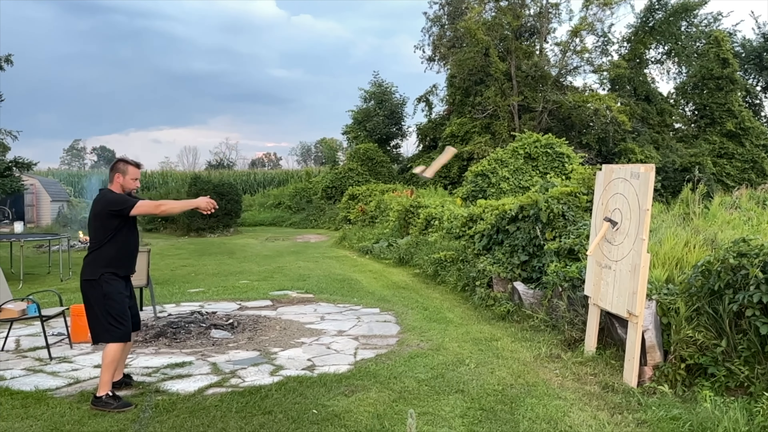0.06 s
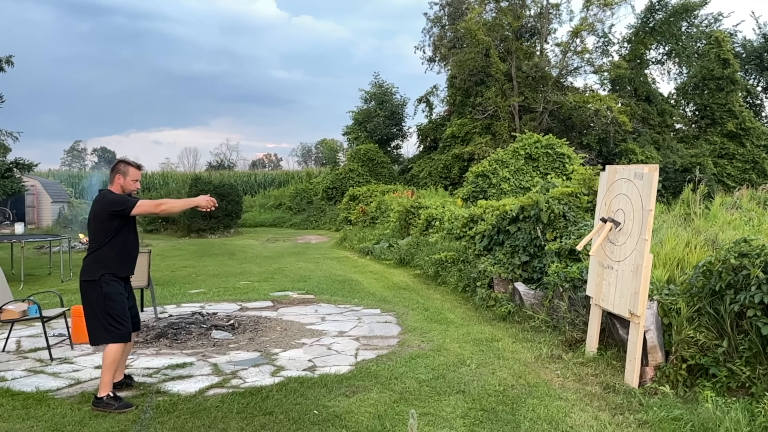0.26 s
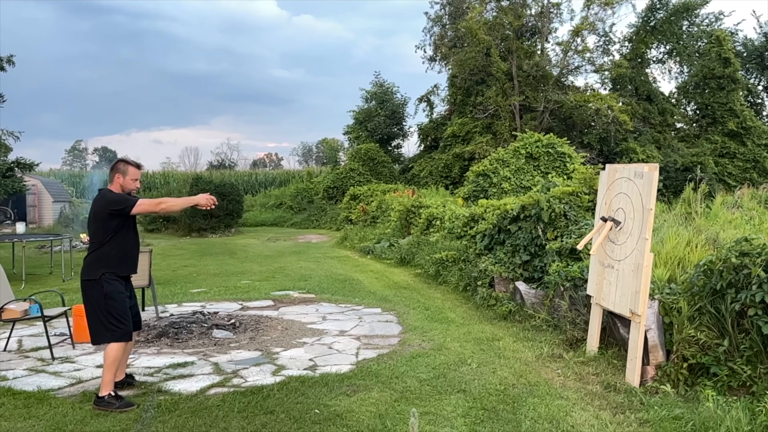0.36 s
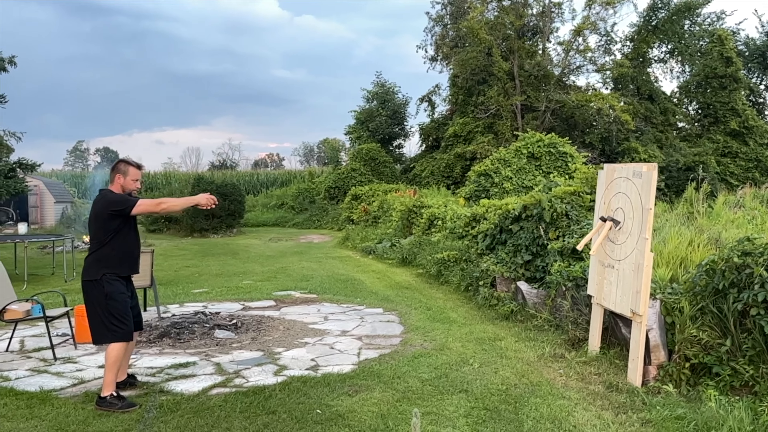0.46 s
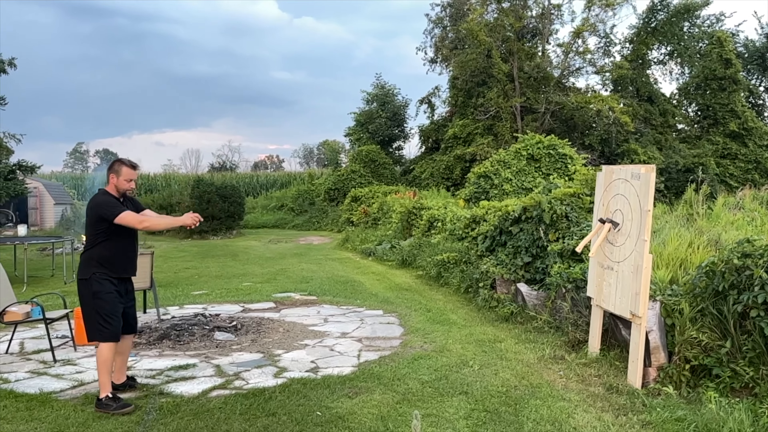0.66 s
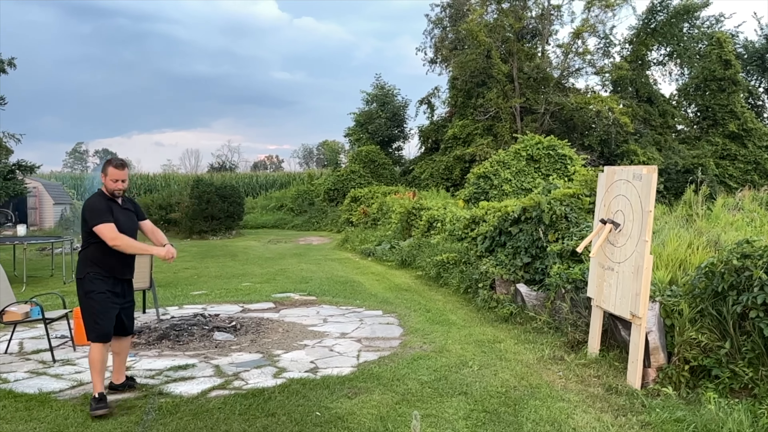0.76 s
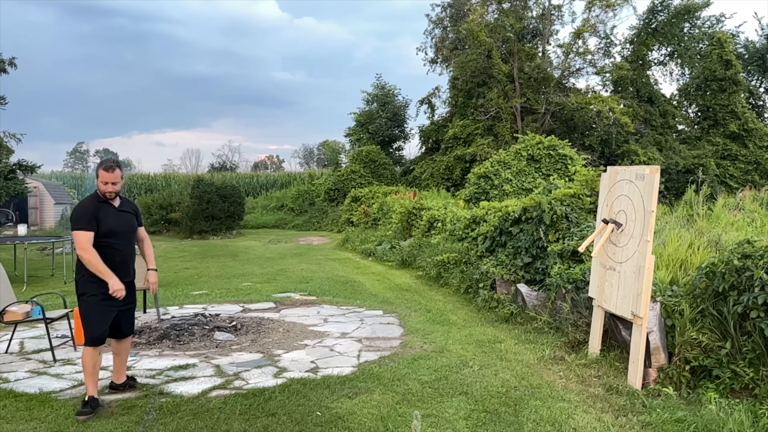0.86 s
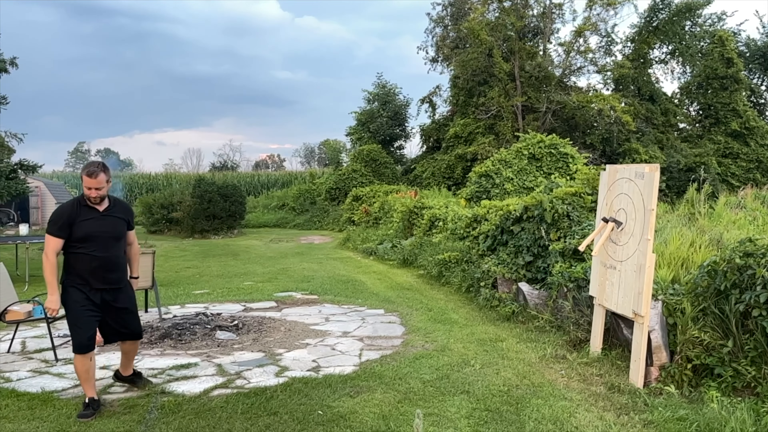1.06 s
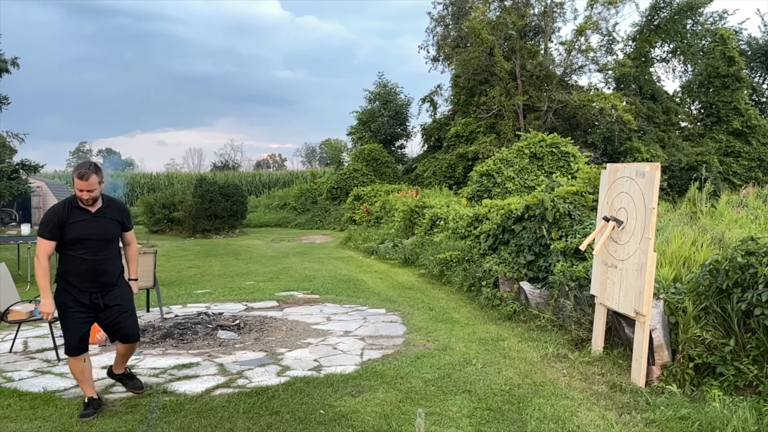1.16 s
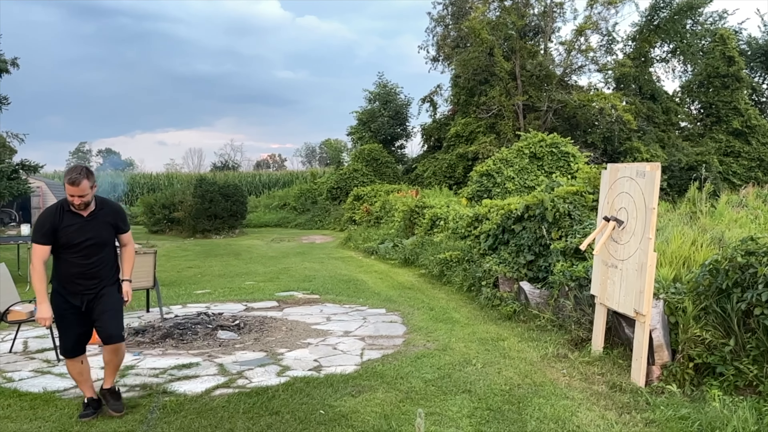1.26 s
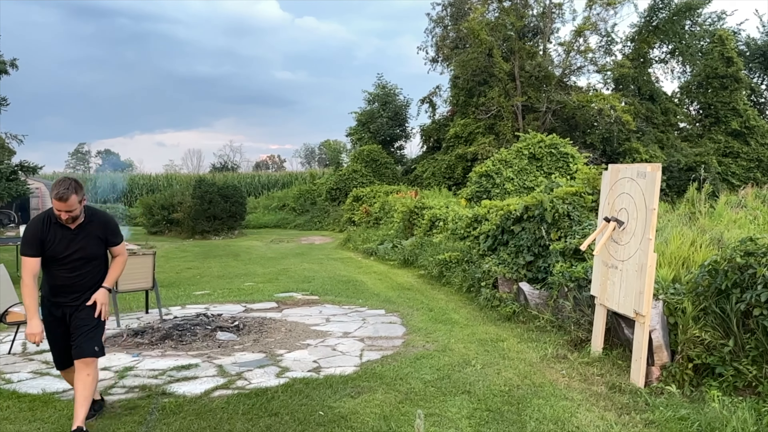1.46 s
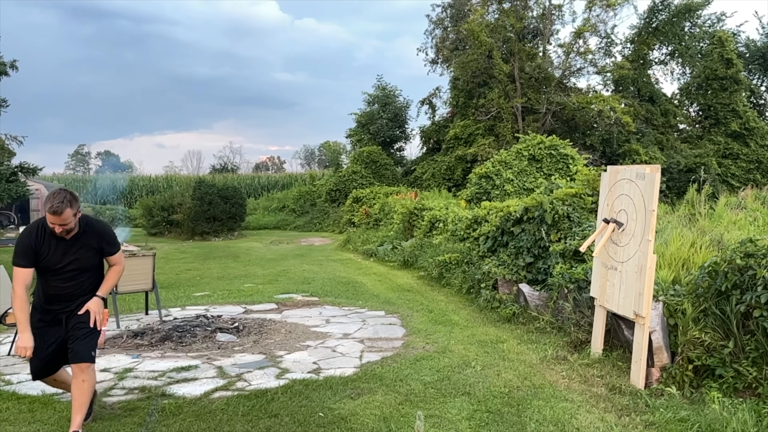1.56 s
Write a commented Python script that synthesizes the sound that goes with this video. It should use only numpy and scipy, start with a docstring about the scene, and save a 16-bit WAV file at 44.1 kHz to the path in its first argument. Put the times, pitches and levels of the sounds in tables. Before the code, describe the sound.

A thrown axe thuds sharply into a wooden board outdoors, with faint crickets and soft wind rumble

```python
"""A backyard at dusk: a thrown axe bites into a plank target a few metres from a phone.
The split is a burst of noise; boards and stand ring as decaying modes, struck again as echoes return.
Bands of noise make the scattered echoes of the yard; crickets chirp in trains of short tone pulses.
Someone shifts on the grass: grainy noise rustles and a low footfall.
Behind it lie a flickering air hiss and the rumble of wind gusts on the microphone ports."""
import sys
import numpy as np
from scipy import signal
from scipy.fft import rfft, irfft
from scipy.io import wavfile
from scipy.ndimage import uniform_filter1d

SR = 44100
rng = np.random.default_rng(int(sys.argv[2]) if len(sys.argv) > 2 else 0)


def int16_out(signal):
    """Quantize to a 16-bit WAV file."""
    q = np.round(np.clip(np.atleast_2d(signal).T, -1, 1) * 32767)
    wavfile.write(sys.argv[1], SR, q.astype(np.int16))


N = 70560
t = np.arange(N) / SR
FREQ = np.maximum(np.arange(N // 2 + 1) * SR / N, 1.)  # Hz; at least 1 so its log exists

# Spectrum of splitting fibres: [f/Hz, relative level/dB per Hz]
BITE_SPECTRUM = [(400, -14.5), (1000, 7.5), (2500, -4.5), (5000, -10), (6500, 1), (8000, -11.5),
                 (12000, -3), (14000, -17.5), (14800, -21.5)]
# Modes of the boards: [f/Hz, level/dB, time to fall 60 dB/s]
BOARD_MODES = [(575.9, -29.5, .07), (663, -13, 0.027), (750, -9, 0.029), (819, -20.5, 0.038),
               (1177, -21, 0.036), (1452, -20.5, 0.083), (1682, -18.5, 0.058), (1950, -13, 0.014),
               (2330, -20, 0.05), (3020, -25, 0.033), (3737, -23.5, 0.044), (4509, -13.5, .03),
               (6474, -17.5, 0.021)]
# Modes of the whole target on its legs: [f/Hz, level/dB, time to fall 60 dB/s]
STAND_MODES = [(90, -16.5, 0.072), (152, 0.5, .065), (189.8, -4.5, 0.1), (338.8, -25, 0.11)]
# The blow and its returns from ground, hedge and wall: [t/s, boards level/dB, stand level/dB]
BLOWS_AND_RETURNS = [(.2298, 0, -2), (.2339, -8, -25.5), (.246, -38, -20), (.272, -40, -27.5),
                     (.306, -44, -23), (.381, -47, -30.5), (.419, -38, -18.5), (.446, -42, -29.5)]
# Scattered returns of the yard: [t/s, bass level/dB, middle level/dB, treble level/dB, top level/dB]
YARD_DECAY = [(0.243, -18, -14.5, -17, -71), (0.257, -28.5, -28.5, -35.5, -59),
              (0.283, -36.5, -40.5, -42.5, -67.5), (0.315, -32, -41.5, -47, -70),
              (0.339, -53, -44.5, -53.5, -76), (0.373, -30.5, -48, -48, -87),
              (0.379, -40, -52.5, -57.5, -70), (0.407, -37, -51.5, -50.5, -80),
              (0.423, -30.5, -44, -55.5, -83), (0.447, -35.5, -57, -57, -89), (0.483, -47.5, -58, -62, -95),
              (0.62, -58, -72.5, -75.5, -104)]
# Limits of those four bands: [low f/Hz, high f/Hz]
YARD_BAND_LIMITS = [(60, 300), (300, 1500), (1500, 7500), (7500, 14500)]
# Colour of the yard's returns: [f/Hz, relative level/dB]
YARD_COLOUR = [(60, 4), (150, 12.5), (299, -3), (300, 8), (800, 10.5), (1500, 1), (3000, -7), (5500, -16),
               (7499, -31), (7500, 1), (14000, 4)]
# How unlike left and right are in each band: [1 minus correlation]
YARD_UNLIKENESS = [0.45, 1, 1, 0.35]
# Microphone ports, towards target and yard: [f/Hz, left minus right level/dB]
PORT_BALANCE = [(60, 1), (200, .5), (370, 0), (680, -3.5), (1260, -2.5), (2310, 1), (4240, 7), (7780, 0),
                (14300, 0)]
# Microphone ports, towards the target: [f/Hz, left's phase lead/rad]
PORT_LEAD = [(300, 0), (700, -.6), (1810, -1.6), (2930, -1.4), (4740, -2.5), (7000, -1.2), (9000, -1.2),
             (14500, -1)]
# Cricket chirps; late pulses approach this pitch and typical peak level:
# [t/s, pulse count, pulse spacing/s, pulse length/s, f/Hz, level/dB, left minus right level/dB]
CRICKET_CHIRPS = [(.002, 7, .0117, .014, 6730, -67, 2), (.638, 8, .0117, .014, 6760, -66, 2),
                  (1.335, 9, .0117, .014, 6740, -67, 2), (.33, 4, .049, .026, 4680, -59, 9),
                  (.93, 4, .048, .024, 4660, -60, 9), (1.41, 4, .048, .026, 4690, -59, 9),
                  (.715, 5, .047, .022, 4200, -64, 3), (1.385, 3, .047, .022, 4200, -65, 0),
                  (.01, 4, .03, .03, 4580, -64, 3), (.45, 6, .022, .018, 5280, -67, 0),
                  (.78, 7, .022, .018, 5300, -67, 0), (1.19, 7, .022, .018, 5280, -67, 0),
                  (1.18, 4, .035, .025, 4500, -66, 0), (1.55, 3, .022, .018, 5300, -67, 0)]
# Cloth and grass rustles: [t/s, length/s, treble level/dB, middle level/dB]
RUSTLE_EVENTS = [(0.056, 0.088, -110, -76), (0.728, 0.18, -82, -70), (0.942, 0.085, -86, -73.5),
                 (1.052, 0.1, -77.5, -69), (1.224, 0.022, -79, -77.5), (1.273, 0.17, -75.5, -98),
                 (1.378, 0.13, -77, -61), (1.521, .1, -82.5, -93.5)]
# Colour of the rustles' treble: [f/Hz, relative level/dB]
RUSTLE_TREBLE_COLOUR = [(7000, -2), (9000, 5.5), (12000, 14.5), (14500, -0.5)]
# Colour of the rustles' middle: [f/Hz, relative level/dB]
RUSTLE_MIDDLE_COLOUR = [(100, -10), (300, 0), (900, -1), (1400, -11), (4000, -26)]
# Spectrum of the distant air: [f/Hz, relative level/dB per Hz]
AIR_SPECTRUM = [(150, -11), (260, -3.5), (340, -9.5), (634, -6), (934, -7), (1110, -14.5), (2360, -14),
                (3030, -12.5), (4200, -9), (4700, -3.5), (5400, -12), (5900, -20.5), (7150, -23),
                (7900, -44), (14500, -60)]
# Balance of the air at the ports: [f/Hz, left minus right level/dB]
AIR_BALANCE = [(60, 18), (110, 0.5), (200, -0.5), (370, -5), (680, 2), (1260, 3.5), (2310, 2.5), (4240, 15),
               (7780, 9), (14300, -2.5)]
# Slow swell of the air: [t/s, level change/dB]
AIR_SWELL_CURVE = [(0, -2.5), (.2, -0.5), (.6, -0.5), (1.0, 0), (1.3, -2), (1.6, 1)]
# Spectrum of wind on the ports: [f/Hz, relative level/dB per Hz]
WIND_SPECTRUM = [(20, 12), (40, 10), (60, 4), (85, 0), (120, -9), (200, -18), (300, -32), (600, -50)]
# Strength of the wind: [t/s, level/dB before flicker]
WIND_GUSTS = [(0, -59), (.08, -58), (.16, -50), (.22, -55), (.5, -54), (.62, -52), (.71, -46), (.77, -54),
              (.84, -52), (.91, -46), (.96, -51), (1.07, -47), (1.14, -49), (1.25, -49), (1.33, -40),
              (1.38, -52), (1.45, -48), (1.6, -48)]

BITE_S, BITE_DB, BITE_T60_S = .2276, -14.5, .01254
BOARD_PUSH_S, STAND_PUSH_S = .0001, .0037  # contact times of the first two blows
BOARD_RETURN_PUSH_S, STAND_RETURN_PUSH_S = .00078, .008  # longer pushes make duller returns
STAND_LAG_S = .0034  # the stand answers after the boards
YARD_RISE_S, YARD_FADE_S = .017, .05
CHIRP_PITCH_CLIMB, CHIRP_PORT_PHASE_RAD = .012, 1.2  # climb as a share of pitch; right port leads
CHIRP_SWELL_DB, PULSE_SCATTER_DB, PULSE_JITTER = 6., 2.5, .08  # jitter as a share of the spacing
STEP_S, STEP_HZ, STEP_DB, STEP_T60_S, STEP_PUSH_S = .857, 290, -50, .08, .002
RUSTLE_GRAIN_DB, RUSTLE_GRAIN_HZ = 2., 100
AIR_DB, AIR_FLICKER_DB, AIR_FLICKER_HZ = -67, 1., 38
WIND_ALIKE, WIND_FLICKER_DB, WIND_FLICKER_HZ = -.1, 2., 25  # alike: correlation of left and right
BOTTOM_HZ, TOP_HZ, CEILING = 55, 14650, 1.15


def undb(db):
    """Convert level in dB to gain."""
    return 10 ** (np.asarray(db) / 20)


def over_frequency(table):
    """Read a (f/Hz, value) table at every frequency, straight between points on a log axis."""
    hz, value = np.array(table, float).T
    return np.interp(np.log(FREQ), np.log(hz), value)


def over_time(table):
    """Read a (t/s, value) table at every sample."""
    return np.interp(t, *np.array(table).T)


def band(spectrum, lo, hi):
    """Keep only the part of a spectrum from lo up to hi Hz."""
    return spectrum * (FREQ >= lo) * (FREQ < hi)


def noise(table, lo=0., hi=1e5, alike=0.79):
    """Two channels of coloured noise, rms 1 overall; alike is their correlation."""
    white = rfft(rng.standard_normal((2, N)))
    mid, side = irfft(band(white * undb(over_frequency(table)), lo, hi), N)
    alike = np.clip(alike, -1, 1)
    opposed = side * np.array([[1], [-1]])
    out = np.sqrt(1 + alike) * mid + np.sqrt(1 - alike) * opposed
    return out / np.sqrt(np.mean(out ** 2))


def walk(rate):
    """Random levels drawn rate times a second, with straight slides between them."""
    hold = int(SR / rate)
    steps = np.repeat(rng.standard_normal(N // hold + 1), hold)
    return 1.2 * uniform_filter1d(steps, hold)[:N]  # 1.2 makes up for spread lost in smoothing


def ring(start, modes, push_s):
    """Decaying modes struck at start; a longer push softens the higher ones."""
    since = np.maximum(t - start, 0)
    x = np.zeros(N)
    for hz, db, t60 in modes:
        x += undb(db) * np.sin(2 * np.pi * hz * since) * 1000. ** (-since / t60)
    push = np.hanning(max(int(push_s * SR), 1) + 2)[1:-1]
    return np.convolve(x, push / push.sum())[:N]


def ports(x, balance_db, lead_rad=0.):
    """Split level and phase differences evenly between the two microphone ports."""
    left = undb(balance_db / 2) * np.exp(.5j * lead_rad)
    return irfft(rfft(x) * np.array([left, 1 / left]), N)


def axe():
    """Fibres crack as a dying noise burst; boards and stand ring at the blow and its returns."""
    since = t - BITE_S
    decay = (since > 0) * 1000. ** (-np.abs(since) / BITE_T60_S)
    x = undb(BITE_DB) * noise(BITE_SPECTRUM, 400)[0] * decay
    for k, (start, board_db, stand_db) in enumerate(BLOWS_AND_RETURNS):
        board_push, stand_push = BOARD_RETURN_PUSH_S, STAND_RETURN_PUSH_S
        if k < 2:
            board_push, stand_push = BOARD_PUSH_S, STAND_PUSH_S
        x = x + undb(board_db) * ring(start, BOARD_MODES, board_push)
        x = x + undb(stand_db) * ring(start + STAND_LAG_S, STAND_MODES, stand_push)
    return ports(x, over_frequency(PORT_BALANCE), over_frequency(PORT_LEAD))


def yard():
    """Dense scattered returns: four bands of noise, each dying in its own way."""
    decay = np.array(YARD_DECAY)
    times = decay[:, 0]
    rise = np.clip((t - times[0]) / YARD_RISE_S + 1, 0, 1)  # complete at the first time listed
    fade = np.clip((times[-1] + YARD_FADE_S - t) / YARD_FADE_S, 0, 1)
    out = 0
    for k, (lo, hi) in enumerate(YARD_BAND_LIMITS):
        level_db = np.interp(t, times, decay[:, k + 1])
        out = out + noise(YARD_COLOUR, lo, hi, 1 - YARD_UNLIKENESS[k]) * undb(level_db)
    return ports(out * rise * fade, over_frequency(PORT_BALANCE))


def crickets():
    """Each chirp is an uneven train of tone pulses that swells and climbs a little in pitch."""
    out = np.zeros((2, N))
    port_phase = np.array([[0], [CHIRP_PORT_PHASE_RAD]])
    chance = rng.standard_normal((len(CRICKET_CHIRPS), 12, 2))
    for (start, count, spacing, length, hz, db, pan_db), c in zip(CRICKET_CHIRPS, chance):
        pan = undb(np.array([[pan_db], [-pan_db]]) / 2)
        for k in range(count):
            shortfall = .5 ** k  # halves with every pulse
            pulse_hz = hz * (1 - CHIRP_PITCH_CLIMB * shortfall)
            pulse_db = db - CHIRP_SWELL_DB * shortfall + PULSE_SCATTER_DB * c[k, 0]
            since = t - start - (k + PULSE_JITTER * c[k, 1]) * spacing
            envelope = np.sin(np.pi * np.clip(since / length, 0, 1)) * undb(pulse_db)
            out += envelope * np.sin(2 * np.pi * pulse_hz * since + port_phase) * pan
    return out


def movement():
    """Cloth and grass rub as grainy noise that swells and fades; one soft footfall is a low ring."""
    treble = noise(RUSTLE_TREBLE_COLOUR, 6000, alike=0.33)
    middle = noise(RUSTLE_MIDDLE_COLOUR, 120, 5300, 1.0)
    out = ring(STEP_S, [(STEP_HZ, STEP_DB, STEP_T60_S)], STEP_PUSH_S)
    grain = undb(RUSTLE_GRAIN_DB * walk(RUSTLE_GRAIN_HZ))
    for start, length, treble_db, middle_db in RUSTLE_EVENTS:
        envelope = np.sin(np.pi * np.clip((t - start) / length, 0, 1)) * grain
        out = out + envelope * (undb(treble_db) * treble + undb(middle_db) * middle)
    return out


def air():
    """Far insects and leaves: half-octave bands of noise whose levels flicker independently."""
    spectrum = rfft(noise(AIR_SPECTRUM, alike=0.))
    edges = 150 * 2 ** np.arange(0, 7.1, .5)  # Hz
    out = 0
    for lo, hi in zip(edges, edges[1:]):
        flicker = undb(AIR_FLICKER_DB * walk(AIR_FLICKER_HZ))
        out = out + irfft(band(spectrum, lo, hi), N) * flicker
    return ports(out, over_frequency(AIR_BALANCE)) * undb(AIR_DB + over_time(AIR_SWELL_CURVE))


def wind():
    """Gusts rumble on the ports: deep noise, almost unrelated left and right, with a quick flicker."""
    flicker_db = WIND_FLICKER_DB * walk(WIND_FLICKER_HZ)
    return noise(WIND_SPECTRUM, alike=WIND_ALIKE) * undb(over_time(WIND_GUSTS) + flicker_db)


def scene():
    """All sources at the two microphone ports."""
    return axe() + yard() + crickets() + movement() + air() + wind()


def record(dry):
    """The phone cuts the deep bass, rounds the loudest peaks and cuts the top."""
    bass_cut = signal.butter(4, BOTTOM_HZ, "high", fs=SR, output="sos")
    top_cut = signal.ellip(10, .2, 90, TOP_HZ, fs=SR, output="sos")  # ripple and rejection in dB
    dry = signal.sosfilt(bass_cut, dry)
    dry = CEILING * np.tanh(dry / CEILING)
    return signal.sosfilt(top_cut, dry)


dry = scene()
out = record(dry)
int16_out(out)
```